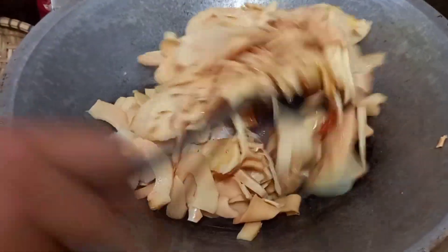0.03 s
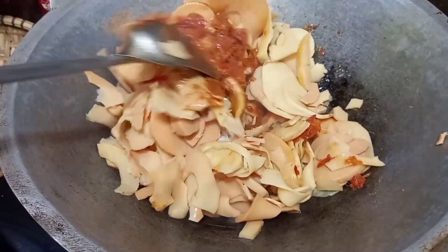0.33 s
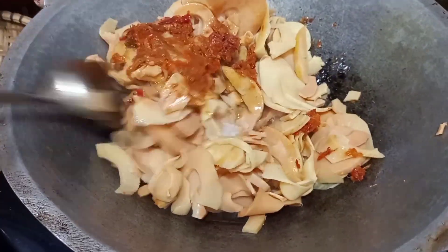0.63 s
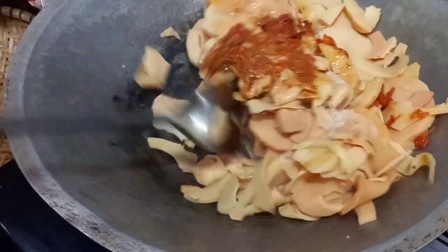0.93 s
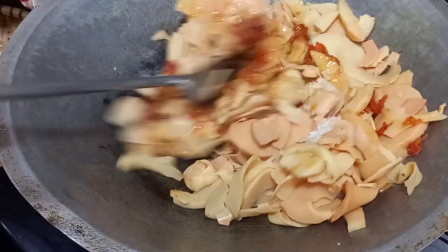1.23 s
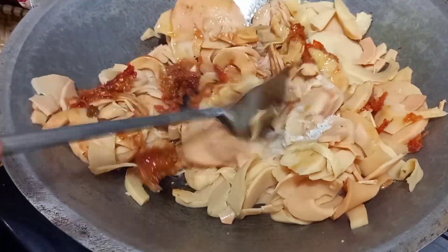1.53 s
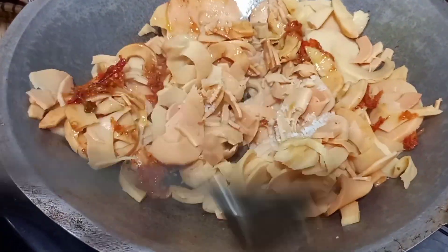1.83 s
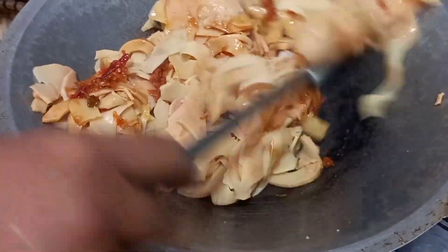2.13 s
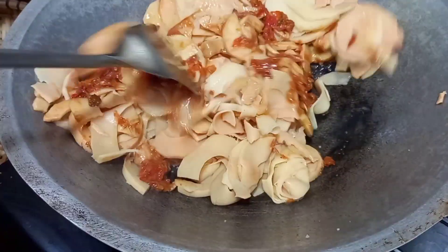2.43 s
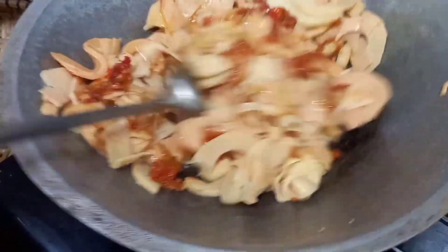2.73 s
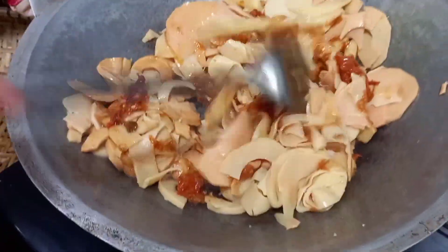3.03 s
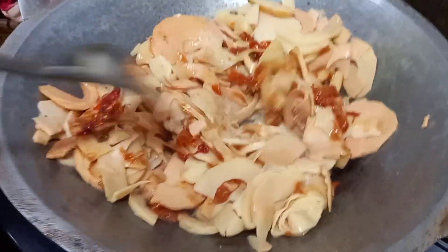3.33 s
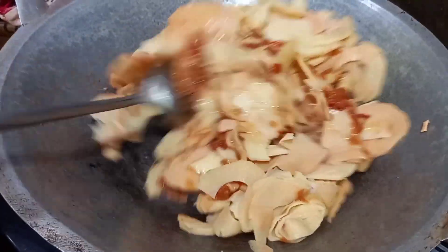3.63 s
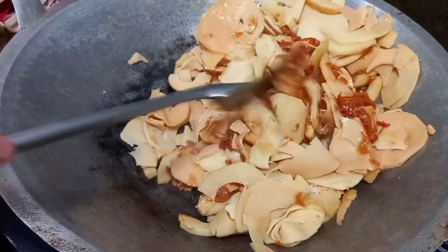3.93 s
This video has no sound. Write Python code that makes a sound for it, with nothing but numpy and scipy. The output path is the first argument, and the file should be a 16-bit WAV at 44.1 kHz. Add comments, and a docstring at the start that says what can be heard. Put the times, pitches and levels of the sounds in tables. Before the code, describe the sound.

Food sizzles in a wok while a metal spatula scrapes, bumps and clinks.

```python
"""Stir-frying in a steel wok

Moist slices fry close by in a small kitchen. Steam fizzes, oil spits and sauce bubbles,
while the stove's burner rumbles underneath. A metal spatula turns the food: it bumps the wok
through the food, scrapes, catches with dry ticks and clinks on bare steel, once loudly."""
import sys
import numpy as np
from scipy import signal
from scipy.fft import rfft, irfft, next_fast_len
from scipy.io import wavfile
from scipy.ndimage import uniform_filter1d, map_coordinates

SR = 44100
rng = np.random.default_rng(int(sys.argv[2]) if len(sys.argv) > 2 else 0)


def transcribe(signal):
    """Save signal, clipped to [-1, 1], as a 16-bit WAV file at the path in sys.argv[1]."""
    frames = np.atleast_2d(signal).T
    limited = np.clip(frames, -1, 1)
    pcm = np.round(limited * 32767).astype(np.int16)
    wavfile.write(sys.argv[1], SR, pcm)


N = 176400  # 4 seconds


def amp(db):
    """Turn decibels into a gain to multiply by."""
    return 10 ** (np.asarray(db) / 20)


def unit(x):
    """Scale a signal to an average strength (rms) of 1."""
    return x / np.sqrt(np.mean(x ** 2) + 1e-20)


def along(points, hz):
    """Read a (pitch, value) table at hz, on a log pitch scale."""
    pitches, values = np.transpose(points)
    return np.interp(np.log(hz + 1), np.log(pitches + 1), values)


def curve(rows):
    """Read a (time, value) table at every sample."""
    return np.interp(np.arange(N) / SR, *np.transpose(rows))


def wobble(rate):
    """A smooth curve through `rate` random points a second."""
    points = rng.standard_normal(int(N * rate / SR) + 4)
    return map_coordinates(points, [np.arange(N) * rate / SR])


def filtered(x, response):
    """Make each pitch in x louder or softer by the gain response(hz)."""
    size = 2 * next_fast_len(N * 3 // 4)
    gain = np.maximum(response(np.fft.rfftfreq(size, 1 / SR)), 1e-6)
    cepstrum = irfft(np.log(gain), size)
    # Fold it so the filter rings only after a sound, never before.
    cepstrum[..., 1:size // 2] *= 2
    cepstrum[..., size // 2 + 1:] = 0
    return irfft(rfft(x, size) * np.exp(rfft(cepstrum)), size)[..., :N]


def band(hz, centre_hz, octaves):
    """A bell-shaped gain: 1 at the centre pitch, fading to either side."""
    return np.exp(-.5 * (np.log2(hz / centre_hz) / octaves) ** 2)


def bursts(rate, scatter_db):
    """Two trains of tiny random clicks, `rate` a second, of scattered size."""
    size = amp(scatter_db * np.clip(rng.standard_normal((2, N)), -2, 2))
    sign = rng.choice([-1, 1], (2, N))
    return unit(size * sign * (rng.random((2, N)) < rate / SR))


# How alike the two ears' signals are (pitch [Hz], likeness [1 = the same])
EAR_LIKENESS = [(100, 1), (250, .9), (450, 0.44), (800, 0.93), (1400, 0.18), (2800, 0), (5500, -0.07),
                (8500, .5), (14000, 0.67), (15600, .92)]
# How much louder the left ear is (pitch [Hz], left minus right [dB])
EAR_BALANCE = [(60, -2.5), (110, 0.5), (200, -1), (380, -1), (700, 3.5), (1290, 2.5), (2380, 3.5),
               (4400, 1.0), (8120, -0.5), (15000, 2)]
def spread(pair, tone):
    """Blend two unrelated signals into one stereo sound with the given tone."""
    def mid_and_side(hz):
        angle = np.arccos(np.clip(along(EAR_LIKENESS, hz), -.99, .99)) / 2
        return amp(along(tone, hz)) * np.array([np.cos(angle), np.sin(angle)])
    mid, side = filtered(pair, mid_and_side)
    ears = np.array([mid + side, mid - side])
    return unit(filtered(ears, lambda hz: amp(np.outer([.5, -.5], along(EAR_BALANCE, hz)))))


# How long the room echoes (pitch [Hz], time to fade by 60 dB [s])
ECHO_TIMES = [(100, 0.32), (400, 0.5), (3000, 0.43), (12000, 0.067)]
def kitchen(x, echo_db):
    """Add the walls' short echo, alike in both ears in the bass."""
    hz, t, noise = signal.stft(rng.standard_normal((2, SR // 2)), SR, nperseg=256)
    angle = np.arccos(np.clip(along(EAR_LIKENESS, hz), -1, 1))[:, None] / 2
    fading = noise * amp(-60 * t / along(ECHO_TIMES, hz)[:, None])
    mid, side = signal.istft(fading * np.array([np.cos(angle), np.sin(angle)]), SR, nperseg=256)[1]
    tail = np.pad([mid + side, mid - side], ((0, 0), (200, 0)))  # arrives 200 samples late
    echo = signal.fftconvolve(np.atleast_2d(x), tail / np.linalg.norm(tail[0]), axes=1)
    return x + amp(echo_db) * echo[:, :x.shape[-1]]


def add(track, s, sound):
    """Mix a sound into a track, starting at s seconds."""
    part = track[..., round(s * SR):][..., :sound.shape[-1]]
    part += sound[..., :part.shape[-1]]


# The steam's bright tone (pitch [Hz], relative level [dB])
STEAM_TONE = [(2500, -34), (4500, -2), (6200, -4), (7400, 0), (7800, 6), (9200, 3), (10400, -1.5),
              (11300, 1), (12300, 6.5), (14000, 5), (15500, 2)]
def steam(flicker_db=1.7):
    """A fine, bright fizz of tiny clicks, with a slight random flicker added across pitch and time."""
    fizz = spread(bursts(rate=16000, scatter_db=3.5), STEAM_TONE)
    spectrum = signal.stft(fizz, nperseg=256)[2]
    flicker = rng.standard_normal(spectrum.shape[1:])
    flicker = uniform_filter1d(flicker, size=7, axis=0)  # smooth over pitch
    flicker = uniform_filter1d(flicker, size=9, axis=1)  # smooth over time
    return unit(signal.istft(spectrum * amp(flicker_db * unit(flicker)), nperseg=256)[1][:, :N])


# The spitting oil's tone (pitch [Hz], relative level [dB])
OIL_TONE = [(600, -27), (1500, 0), (4000, -15), (9000, -2), (13000, -3)]
def oil():
    """Single oil drops spit with sharp clicks."""
    return kitchen(spread(bursts(rate=300, scatter_db=4.3), OIL_TONE), echo_db=-19)


# How the sizzle rises and falls (time [s], relative level [dB])
SIZZLE_LEVELS = [(0, -30.5), (.25, -29.8), (.52, -29.9), (.68, -33), (.9, -29.9), (1.16, -32.7),
                 (1.27, -32.8), (1.4, -30.9), (1.54, -33.8), (1.66, -31), (1.92, -31.2), (2.1, -30.1),
                 (2.25, -32.3), (2.4, -29.9), (2.78, -30.2), (3.02, -31.8), (3.24, -33.6), (3.42, -32.2),
                 (3.52, -33.7), (3.69, -30.7), (3.87, -33.9), (4, -33.8)]
def sizzle(steam_db=6.5, oil_db=-3.5, wobble_db=.6):
    """Steam and oil grow louder and softer together."""
    level = amp(curve(SIZZLE_LEVELS) + wobble_db * wobble(45))
    return level * (amp(steam_db) * steam() + amp(oil_db) * oil())


def bubbles(count=3000, centre_hz=1900, octaves=.77, fade_cycles=1.74):
    """Small bubbles, each ringing for a few cycles as it bursts."""
    t = np.arange(400) / SR
    pitch = np.clip(rng.standard_normal((count, 1)), -2, 2)
    cycles = centre_hz * 2 ** (octaves * pitch) * t
    pops = np.sin(2 * np.pi * cycles) * np.exp(-cycles / fade_cycles)
    positions = rng.integers(0, N, (count, 1)) + np.arange(len(t))
    return unit(np.bincount(positions.ravel(), pops.ravel(), N)[:N])


# Pitches that ring in the wok's hollow (pitch [Hz], width [Hz], boost [dB])
HOLLOW_PEAKS = [(1022, 40, 3), (1318, 40, 3.5), (1496, 50, 3), (1915, 50, 3), (2711, 90, 2), (2886, 50, 2),
                (3461, 110, 3)]
def hollow(hz):
    """Gain of the wok's hollow, which boosts a few narrow bands of pitch."""
    return amp(sum(db / (1 + (2 * (hz - centre) / width) ** 2) for centre, width, db in HOLLOW_PEAKS))


# How the bubbling rises and falls (time [s], relative level [dB])
SAUCE_LEVELS = [(0, -30.5), (.3, -31), (.45, -30.5), (.8, -30.5), (.88, -31.5), (1.05, -31.5), (1.55, -31),
                (1.9, -30.5), (2.08, -30.5), (2.26, -33), (2.55, -32), (2.7, -31), (3.05, -33), (3.62, -33),
                (3.85, -35.5), (4, -33)]
# The bubbling's tone (pitch [Hz], relative level [dB])
SAUCE_TONE = [(30, -50), (250, -20), (400, -24.5), (480, -22), (570, -8.5), (800, -9.5), (1030, -3.5),
              (1200, -4.5), (1450, 0.5), (1680, -3), (1900, 0), (2080, -0.5), (2300, 0), (3200, 2.5),
              (3480, 2.5), (3700, 3), (4800, -3), (7000, -8), (12000, -41.5)]
def sauce(gain_db=2.5, wobble_db=.64):
    """Sauce simmers in the wok's hollow: ringing bubbles among many tiny bursts."""
    pops = amp(-11) * np.array([bubbles(), bubbles()])
    simmer = spread(pops + bursts(rate=7000, scatter_db=3.5), SAUCE_TONE)
    level = amp(curve(SAUCE_LEVELS) + gain_db + wobble_db * wobble(16))
    return level * unit(filtered(simmer, hollow))


# How the rumble rises and falls (time [s], relative level [dB])
BURNER_LEVELS = [(0, -38.5), (.3, -42.5), (.7, -44.5), (.9, -38.5), (1.06, -44), (1.42, -39.5),
                 (1.53, -51.5), (1.66, -38), (1.89, -52.5), (1.99, -44), (2.14, -46), (2.37, -47.5),
                 (2.53, -51), (2.75, -47), (3.1, -47), (3.32, -43.5), (3.55, -47.5), (3.7, -46), (4, -52)]
# The rumble's deep tone (pitch [Hz], relative level [dB])
BURNER_TONE = [(20, -32), (45, -22.5), (62, -1.5), (90, -1.5), (140, -1), (170, -12), (260, -6.5),
               (330, -14.5), (450, -19), (900, -45)]
def burner(gain_db=1, hum_hz=110.2, hum_db=-51.5):
    """The burner rumbles unevenly; a low, wavering hum swells along with it."""
    level_db = curve(BURNER_LEVELS)
    rumble = amp(level_db + gain_db) * spread(rng.standard_normal((2, N)), BURNER_TONE)
    hum = np.sin(2 * np.pi * hum_hz * np.arange(N) / SR + .29 * wobble(2.46))
    return rumble + amp(hum_db + level_db - level_db.mean()) * unit(hum)


def ring(notes, t, weight):
    """Struck metal rings with fading notes of its own, each scaled by weight(hz)."""
    return sum(weight(hz) * amp(db + rng.normal(0, 1) - 60 * t / fade_s) * np.sin(2 * np.pi * hz * t)
               for hz, db, fade_s in notes)


# The notes the wok rings with (pitch [Hz], relative level [dB], time to fade by 60 dB [s])
WOK_NOTES = [(91, -8, .25), (205, -3.5, .2), (234, -1, .16), (262, -1.5, .26), (314, 0, .17), (335, 1, .17),
             (357, -4, .14), (379, -1, .16), (551, -10, .24), (584, -11, .14), (635, -13, .18),
             (700, -7, .3), (890, -17, .15), (1335, -18, .2), (1490, -18, .2)]
# Bumps through the food (time [s], relative level [dB], centre pitch [Hz])
FOOD_BUMPS = [(0.071, -34, 248), (0.199, -45, 247), (0.862, -38, 246), (1.116, -24.5, 240),
              (1.326, -24.5, 233), (1.617, -36, 244), (2.246, -48, 235), (2.705, -31, 215),
              (2.7984, -18, 430), (2.81, -16, 340), (3.101, -36, 234), (3.282, -22, 232), (3.422, -42, 235)]
def bumps(floor_db=-20.5, rise_s=.0033):
    """Cushioned by food, the spatula wakes mostly the wok's low notes."""
    out, t = np.zeros((2, N)), np.arange(SR * 3 // 4) / SR
    for s, db, centre_hz in FOOD_BUMPS:
        octaves = .28 * centre_hz / 250  # harder bumps wake a higher, wider band
        thud = ring(WOK_NOTES, t, lambda hz: band(hz, centre_hz, octaves) + amp(floor_db))
        rise = 1 - np.exp(-t / rise_s)
        add(out, s, kitchen(amp(db) * thud * rise, echo_db=-10))
    return out


# Spatula strokes (time [s], length [s], relative level [dB], start pitch [Hz], end pitch [Hz])
STROKES = [(0.238, 0.37, -30.5, 3400, 2370), (0.457, 0.39, -33, 2260, 1850), (1.0, 0.37, -35, 1280, 1410),
           (1.592, 0.55, -32.5, 2480, 2300), (1.64, 0.3, -39, 5000, 5000), (2.356, 0.49, -38, 3500, 3450),
           (2.796, 0.025, -27, 1500, 2300), (2.796, 0.105, -29, 3600, 2900), (3.14, .07, -30.5, 3500, 3400),
           (3.493, 0.14, -35, 2210, 2600), (3.59, 0.098, -33, 4600, 4900), (3.66, 0.079, -27.5, 5800, 5900)]
# The scraping's tone (pitch [Hz], relative level [dB])
SCRAPE_TONE = [(20, -66), (300, -23), (1000, 2), (2300, 5), (3100, 0.5), (3480, 3), (3900, 4.5),
               (5200, -0.5), (8000, -11), (15000, -4.5)]
def scrapes(octaves=.24, floor_db=-10, judder_db=1.5):
    """The blade slips over steel in a swell of tiny catches; their pitch glides as it travels."""
    out, t = np.zeros((2, N)), np.arange(N) / SR
    catches = spread(bursts(rate=4000, scatter_db=3.5), SCRAPE_TONE)
    for s, length, db, start_hz, end_hz in STROKES:
        shifted = np.roll(catches, rng.integers(N), axis=1)
        hz, times, spectrum = signal.stft(shifted, SR, nperseg=512)
        glide_hz = np.interp(times, [s, s + length], [start_hz, end_hz])
        peak = band(hz[:, None] + 1, glide_hz, octaves) + amp(floor_db)
        rasp = unit(signal.istft(spectrum * peak, nperseg=512)[1][:, :N])
        swell = np.sin(np.pi * np.clip((t - s) / length, 0, 1))
        out += amp(db) * swell * rasp
    return kitchen(out * amp(judder_db * wobble(45)), echo_db=-10)


# Single catches of the blade's edge (time [s], relative level [dB], centre pitch [Hz])
EDGE_TICKS = [(0.447, -38, 9000), (1.3, -24.5, 1270), (1.9595, -27.5, 910), (2.235, -32, 1550)]
def ticks(fade_s=.0058, octaves=1):
    """The blade's edge catches and lets go with a short, dry tick."""
    out, t = np.zeros((2, N)), np.arange(N) / SR
    for s, db, centre_hz in EDGE_TICKS:
        noise = filtered(rng.standard_normal(N), lambda hz: band(hz + 1, centre_hz, octaves) + .016)
        tick = amp(db) * unit(noise) * np.exp(-t / fade_s)
        add(out, s, kitchen(tick[:SR // 2], echo_db=-4.5))
    return out


# The notes the spatula rings with (pitch [Hz], relative level [dB], time to fade by 60 dB [s])
SPATULA_NOTES = [(2890, -6, .05), (2950, -10, .16), (3170, -10, .16), (3290, -10, .1), (3480, -4, .05),
                 (3540, 3, .028), (3630, -13, .13), (4307, -12, .04), (5500, -14, .025), (8050, -9, .04),
                 (12400, -5, .015)]
# How strongly a bare tap wakes the wok's notes (pitch [Hz], boost [dB])
TAP_TONE = [(90, 0.5), (200, -4), (340, -16.5), (560, -1), (700, -1), (890, 10), (1500, 7)]
# Taps on bare steel (time [s], relative level [dB])
STEEL_TAPS = [(1.9588, -13), (2.3156, -34), (3.1901, -29), (3.695, -43)]
def clinks(wok_db=-12, crack_db=-4, crack_s=.0049, rise_s=.001, lean_left_db=.5):
    """Steel hits steel: a crack, the blade's bright ring and all of the wok's notes."""
    out, t = np.zeros((2, N)), np.arange(SR * 3 // 4) / SR
    for s, db in STEEL_TAPS:
        crack = amp(crack_db) * np.exp(-t / crack_s) * rng.standard_normal(len(t))
        wok = ring(WOK_NOTES, t, lambda hz: amp(wok_db + along(TAP_TONE, hz)))
        blade = ring(SPATULA_NOTES, t, np.ones_like)
        hit = (blade + crack + wok) * (1 - np.exp(-t / rise_s))
        add(out, s, kitchen(amp(db) * hit, echo_db=-7.5))
    return out * amp(lean_left_db * np.array([[.5], [-.5]]))


def scene():
    """Frying, burner and spatula together."""
    return sizzle() + sauce() + burner() + bumps() + scrapes() + ticks() + clinks()


def record(dry, top_hz=15850):
    """Cut away the very highest treble, above top_hz."""
    size = next_fast_len(N + SR // 2)
    kept = np.fft.rfftfreq(size, 1 / SR) < top_hz
    return irfft(rfft(dry, size) * kept, size)[:, :N]


dry = scene()
out = record(dry)
transcribe(out)
```